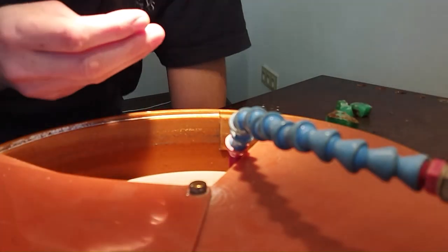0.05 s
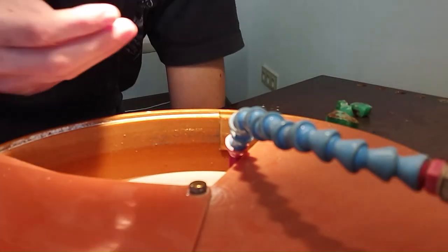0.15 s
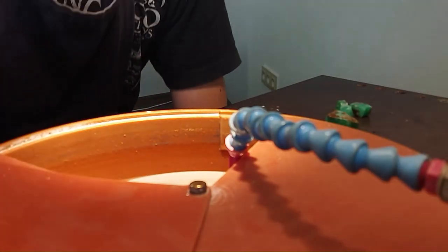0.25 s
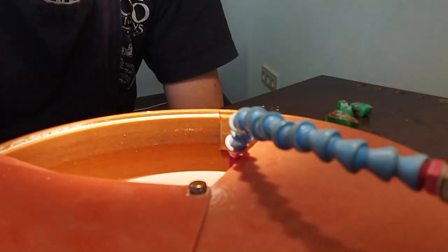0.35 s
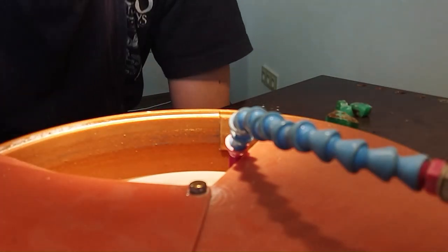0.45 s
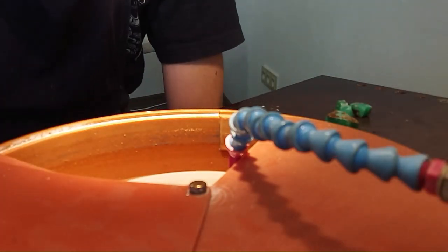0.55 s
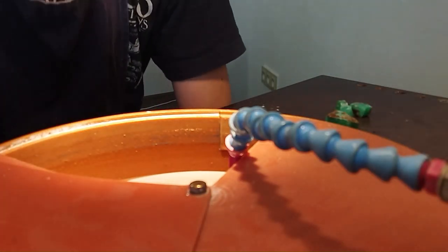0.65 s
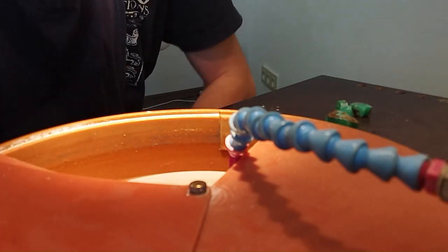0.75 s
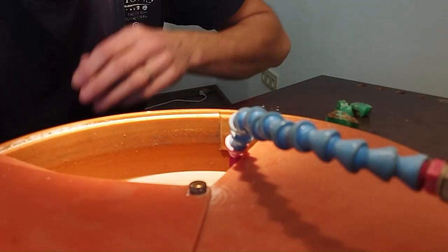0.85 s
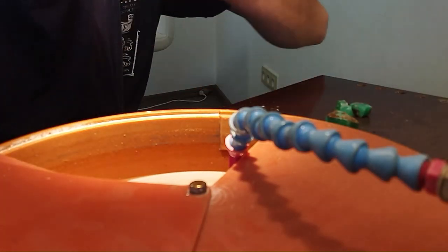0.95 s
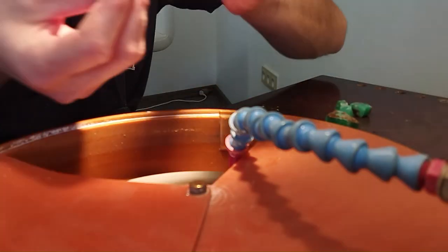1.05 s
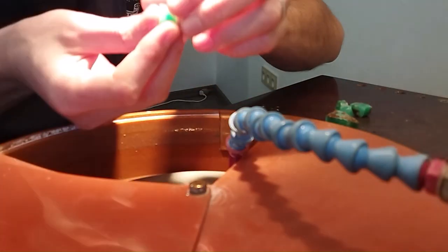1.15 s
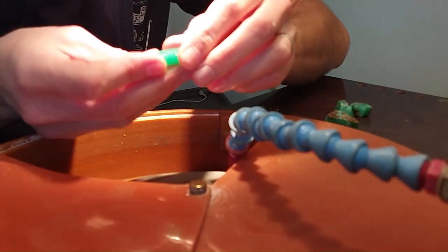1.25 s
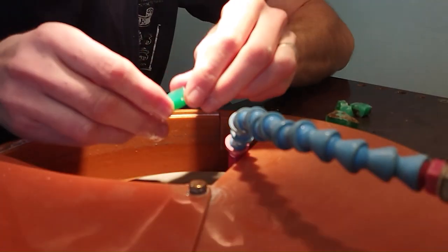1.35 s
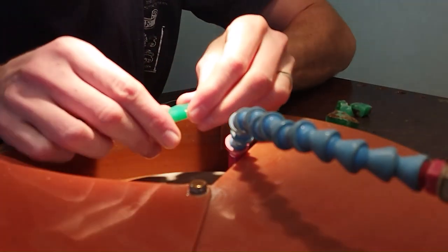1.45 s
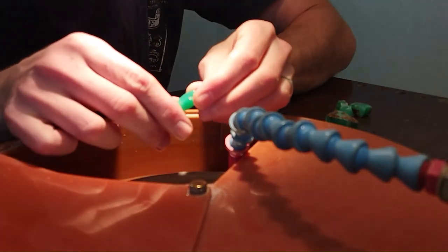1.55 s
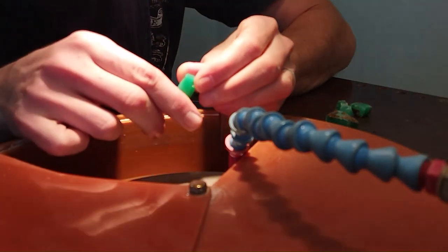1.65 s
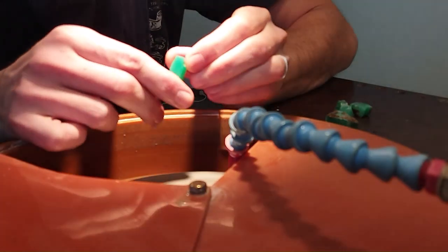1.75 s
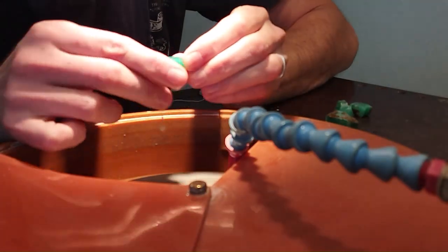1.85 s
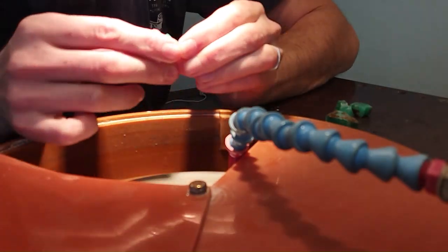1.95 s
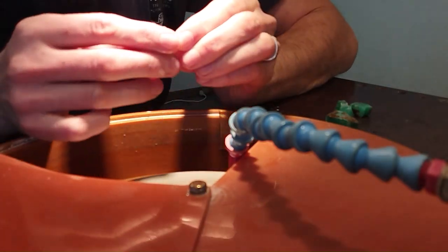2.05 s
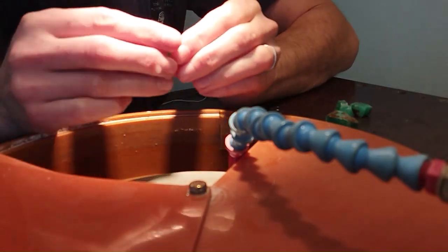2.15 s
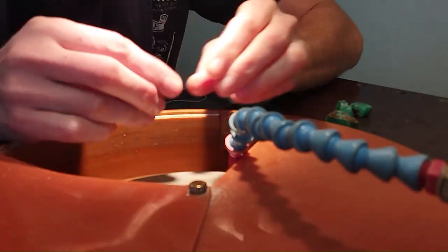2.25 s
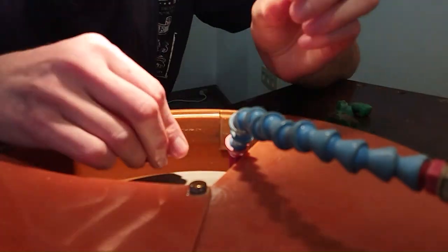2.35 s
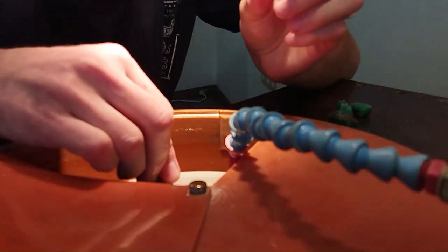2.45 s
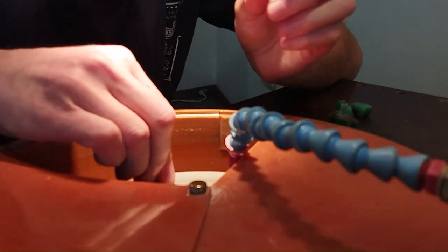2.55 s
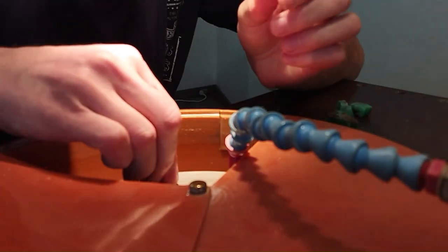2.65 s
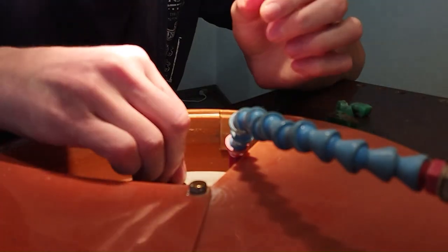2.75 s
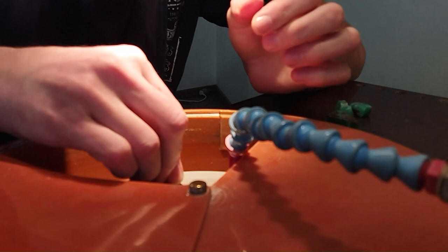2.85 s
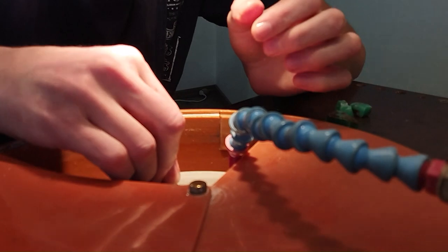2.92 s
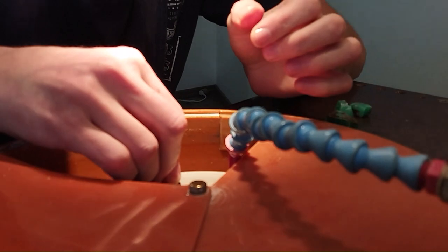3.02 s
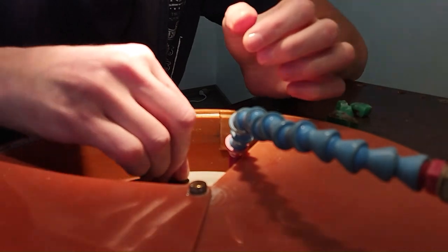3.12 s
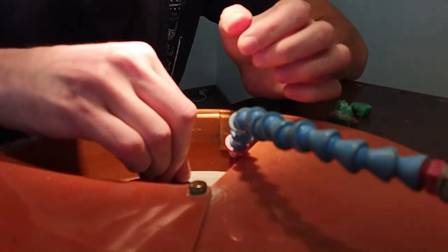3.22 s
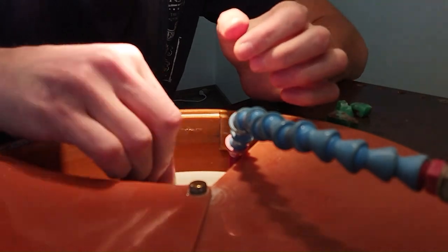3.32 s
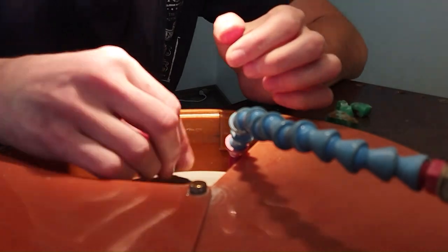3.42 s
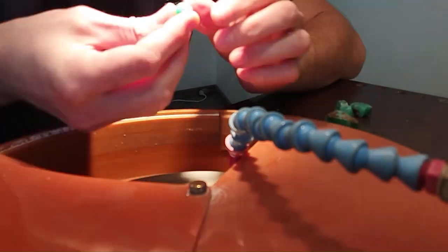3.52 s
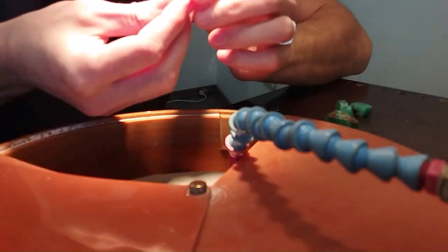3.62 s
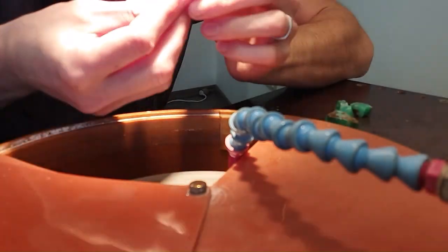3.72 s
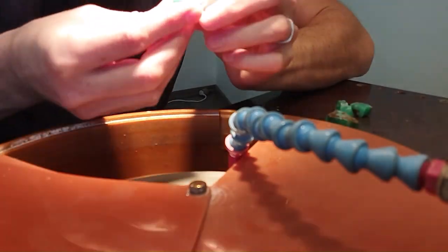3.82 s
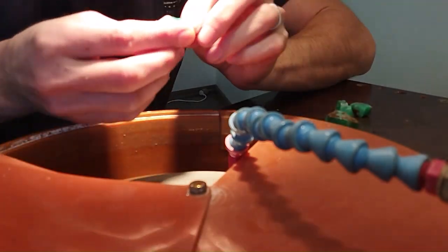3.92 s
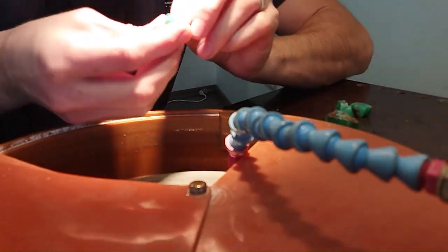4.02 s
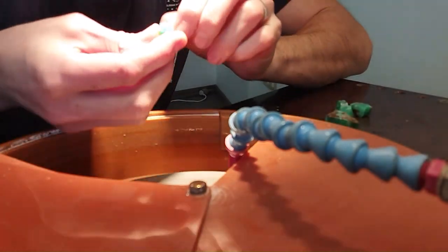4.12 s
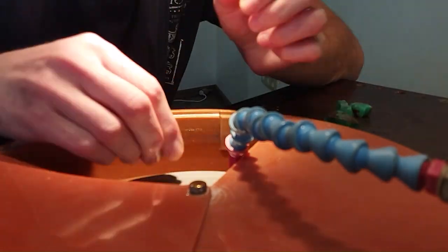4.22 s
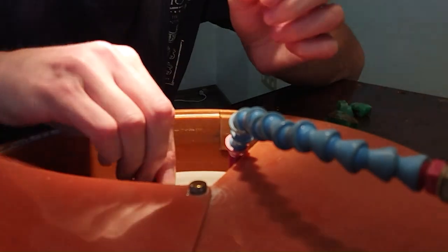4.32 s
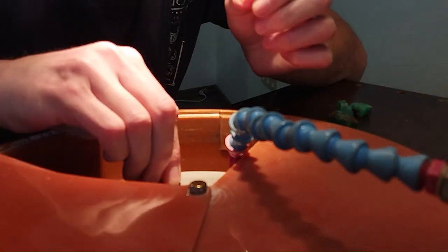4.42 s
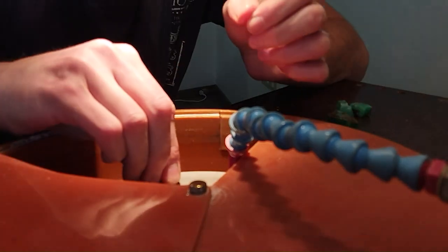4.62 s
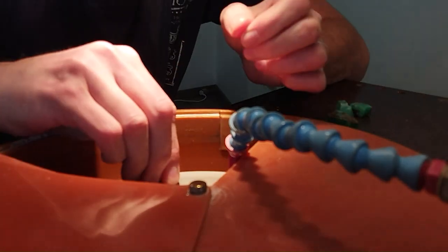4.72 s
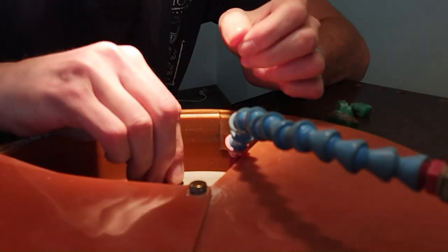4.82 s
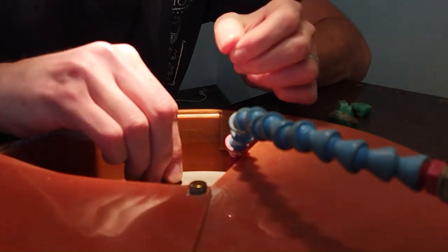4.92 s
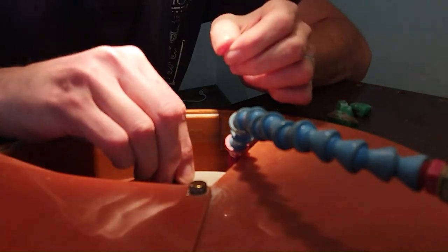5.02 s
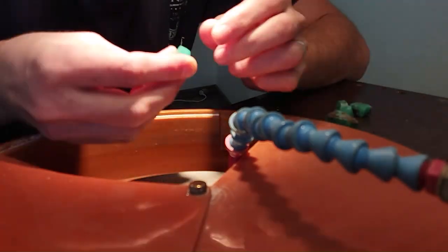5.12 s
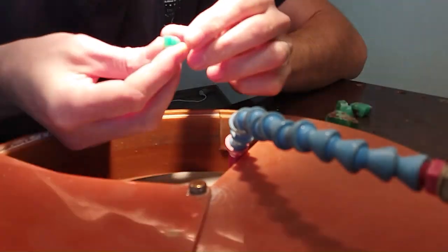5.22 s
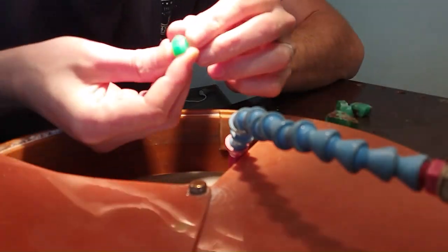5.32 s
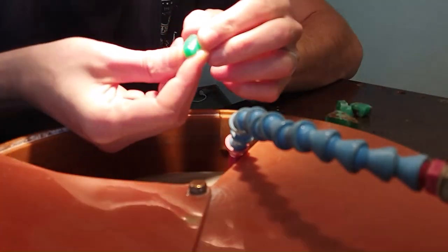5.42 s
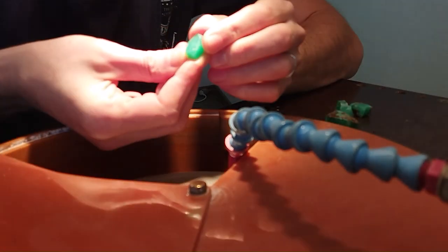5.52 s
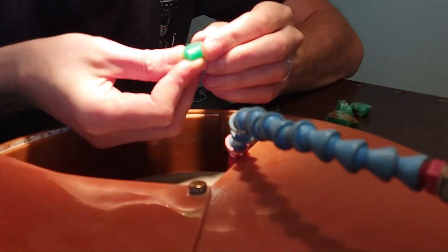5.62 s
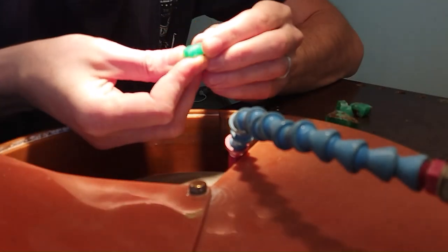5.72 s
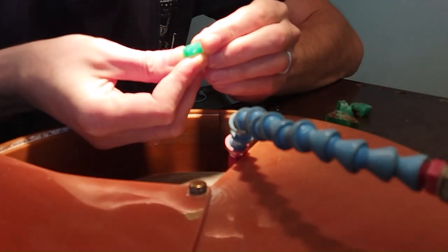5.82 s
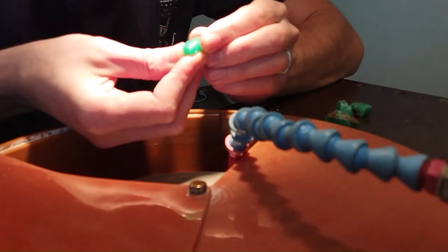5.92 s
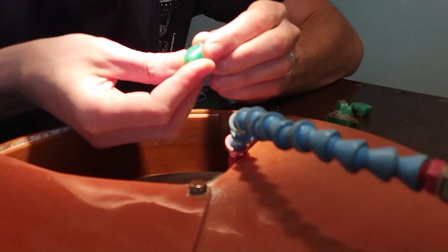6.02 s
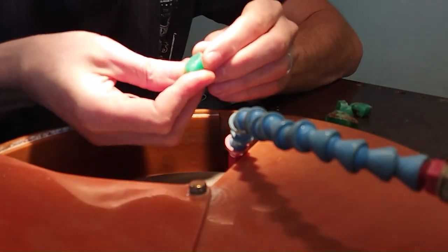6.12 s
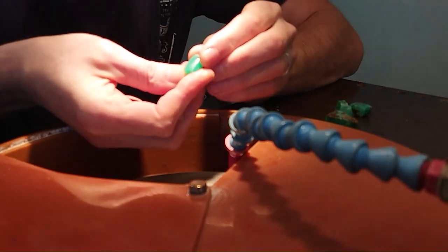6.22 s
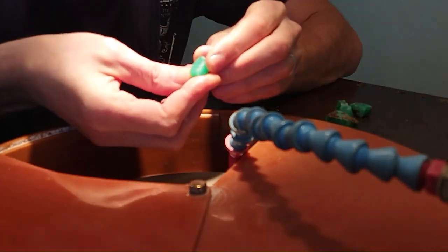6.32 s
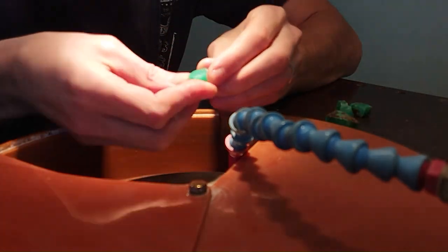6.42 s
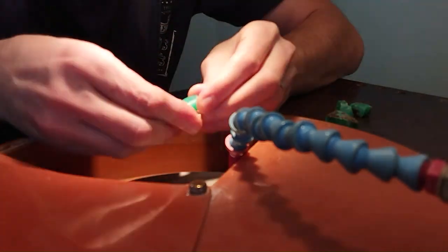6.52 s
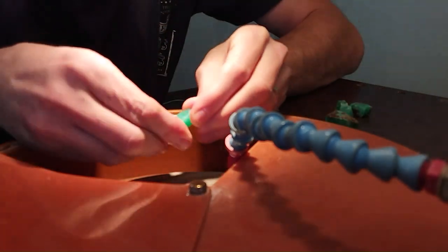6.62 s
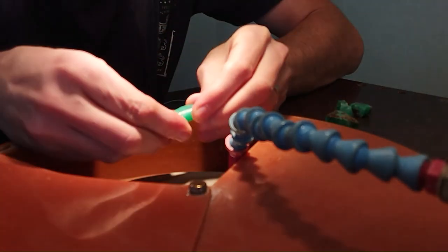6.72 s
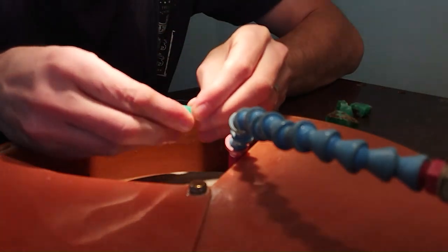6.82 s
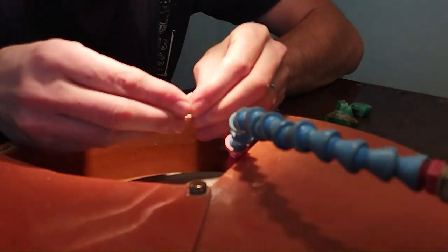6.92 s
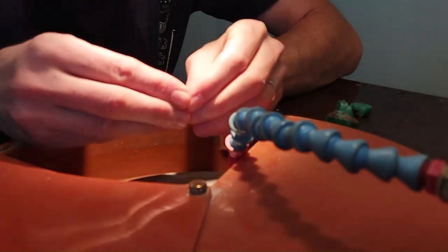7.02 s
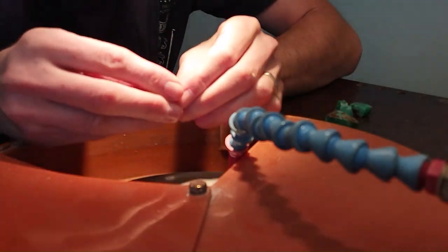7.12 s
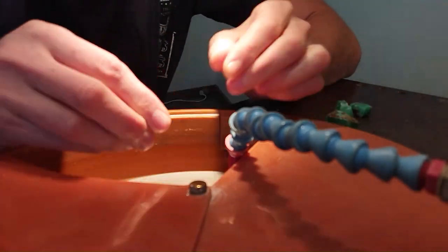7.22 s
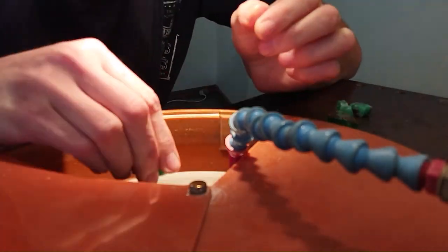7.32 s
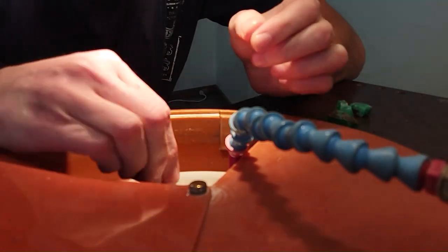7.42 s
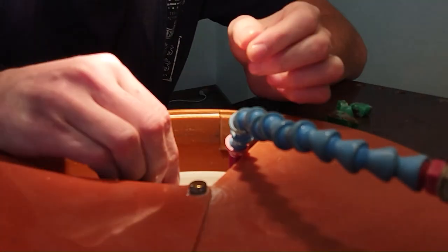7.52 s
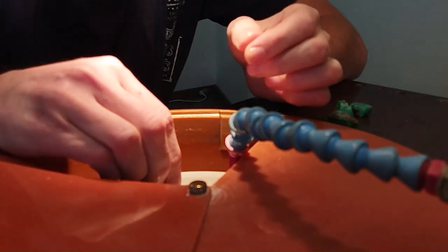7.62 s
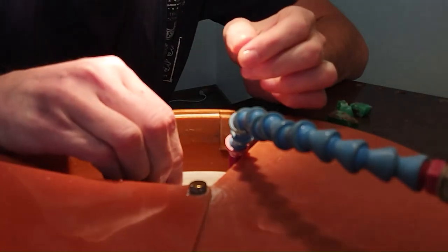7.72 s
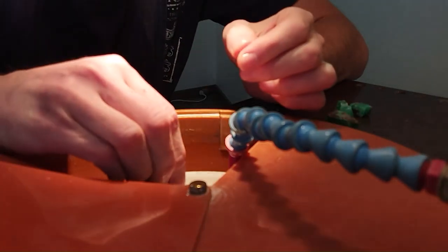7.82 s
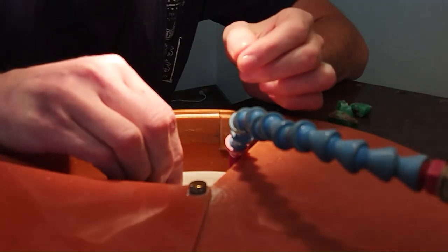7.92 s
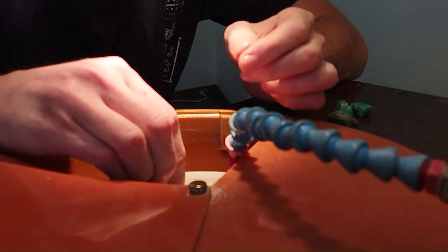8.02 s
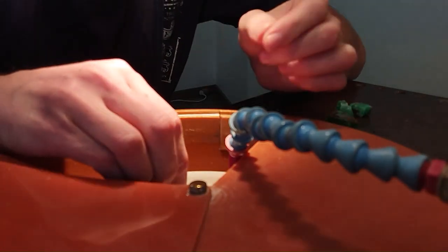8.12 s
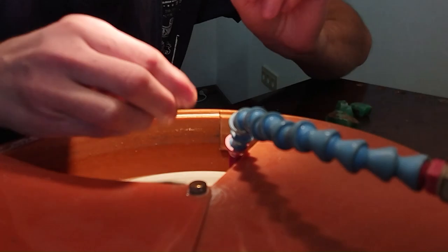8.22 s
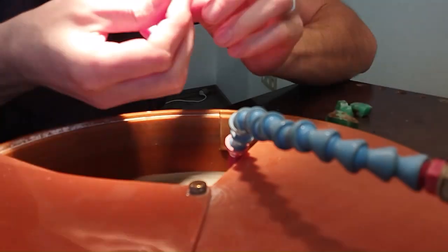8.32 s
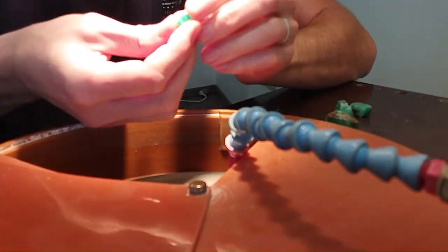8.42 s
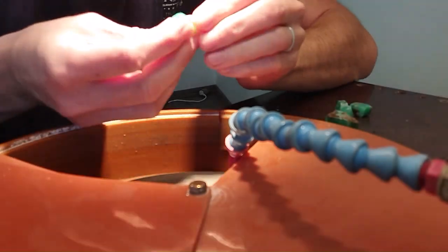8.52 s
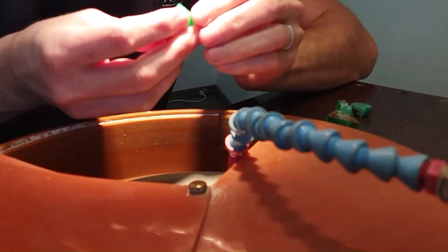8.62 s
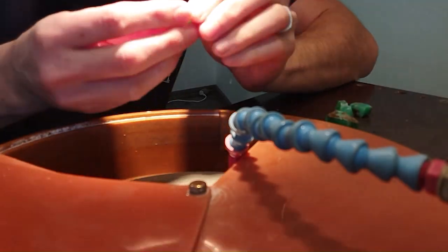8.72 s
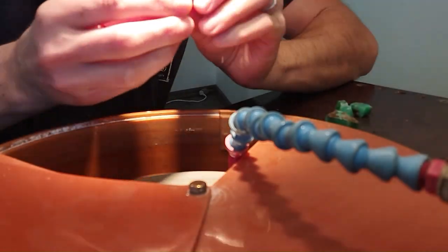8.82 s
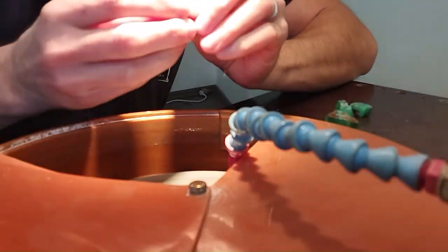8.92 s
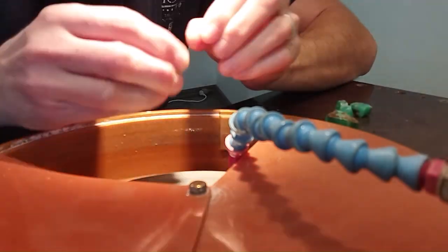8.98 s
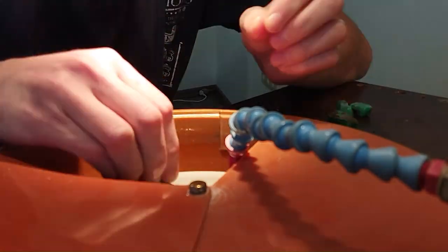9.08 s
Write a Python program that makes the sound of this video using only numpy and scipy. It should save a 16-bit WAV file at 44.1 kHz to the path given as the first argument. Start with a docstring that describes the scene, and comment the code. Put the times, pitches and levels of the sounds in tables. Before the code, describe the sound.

A wet grinding wheel hums, whines and rattles in a small workshop while a stone is pressed on three times with loud, bright, singing hisses.

```python
"""From the start a lapidary wheel spins in a plastic tub in a small hard-walled workshop: motor tones hum and
whine, random impacts make the rattle and the wash of water; early on, noise bursts make a faint rustle of
clothing, then soft knocks on the bench. Then a small stone is pressed on three times: a tick and a ring of the
disc at first touch, then grit hisses as shaped noise and the seated stone sings through its resonances until
it lifts. Single disc clacks come before and during the presses; a dull thud of the tub marks each landing."""
import sys
import numpy as np
from scipy import signal
from scipy.fft import rfft, irfft, next_fast_len
from scipy.io import wavfile
from scipy.ndimage import uniform_filter1d, map_coordinates

SR = 44100
rng = np.random.default_rng(int(sys.argv[2]) if len(sys.argv) > 2 else 0)


def pcm_store(signal):
    """Save signal as 16-bit PCM."""
    levels = np.round(np.clip(np.atleast_2d(signal), -1, 1) * 32767)
    wavfile.write(sys.argv[1], SR, levels.astype(np.int16).T)


N = 403515
TIME = np.arange(N) / SR
SIZE = next_fast_len(N + SR // 2, True)  # transform length, with space for the reflections
FREQ = np.fft.rfftfreq(SIZE, 1 / SR)


def gain_of(db):
    """Amplitude factor of a level in dB."""
    return 10 ** (np.asarray(db) / 20)


def evened(x):
    """Scales a signal to rms 1."""
    return x / np.sqrt(np.mean(x ** 2) + 1e-20)


def read(points, column=1):
    """One column of a table, joined by straight lines on a log-frequency axis."""
    rows = np.array(points, float)
    return np.interp(np.log(FREQ + 1), np.log(rows[:, 0] + 1), rows[:, column])


def curve(points):
    """A two-column table over time, joined by straight lines."""
    return np.interp(TIME, *np.transpose(points))


def modes(rows):
    """Gain over frequency of a set of steep-sided resonances, which radiate no deep bass."""
    power = 0
    for hz, width, db in rows:
        no_bass = np.minimum(FREQ / hz, 1)
        peak = gain_of(db) * no_bass / (1 + ((FREQ - hz) / width) ** 2)
        power = power + peak ** 2
    return np.sqrt(power)


def hump(s, half_s):
    """A smooth rise and fall of height 1 round a moment."""
    return np.exp(-((TIME - s) / half_s) ** 2)


def blow(s, rise, t60):
    """Strength of a blow over time: a short rise, then an exponential fall."""
    fall = np.exp(-np.maximum(TIME - s - rise, 0) * np.log(1000) / t60)
    return np.clip((TIME - s) / rise, 0, 1) * fall


def drift(rate_hz):
    """A random curve of rms 1, joining two random points per cycle of the given rate."""
    knots = rng.standard_normal(8192)
    return evened(np.interp(TIME * rate_hz * 2, np.arange(len(knots)), knots))


def noise():
    """Two independent streams of white noise."""
    return rng.standard_normal((2, N))


def grains(per_s, spread_db):
    """Two independent streams of tiny random impacts; the spread makes their sizes more unequal."""
    size = gain_of(spread_db * np.minimum(rng.exponential(1, N), 4))
    return evened(noise() * size * (rng.random(N) < per_s / SR))


def tone(hz, waver, flutter_db):
    """A sine line of rms 1 that wavers in pitch and strength."""
    turns = np.cumsum(hz * (1 + waver * drift(14))) / SR
    return evened(np.sin(2 * np.pi * turns) * gain_of(flutter_db * drift(6.6)))


def shifted(x, hz):
    """Slides every frequency of a sound up or down by a curve in Hz."""
    turns = np.cumsum(hz * np.ones(N)) / SR
    return (signal.hilbert(x, SIZE)[:, :N] * np.exp(2j * np.pi * turns)).real


def workshop(wet_db, t60):
    """Direct gain, and dense decaying reflections from tub, bench and walls for three spots round the wheel."""
    t = np.arange(SR // 2) / SR
    shape = (3, 2, len(t))
    taps = rng.standard_normal(shape) * (rng.random(shape) < .1) * (t > .002)
    taps *= np.exp(-np.log(1000) * t / t60)
    taps *= gain_of(wet_db) / np.linalg.norm(taps, axis=-1, keepdims=True)
    direct = 1 / np.hypot(1, gain_of(wet_db))
    return direct, direct * rfft(taps, SIZE)


def radiate(drive, colour, ports, room):
    """A drive fills the room, takes a colour and reaches both ports; for white noise their mean keeps its level."""
    direct, tails = room
    # the moving hands keep changing the reflections: the three spots trade places in a steady cycle
    spot = np.arange(len(tails))[:, None, None] / len(tails)
    share = np.cos(np.pi * (1.3 * TIME + spot)) * np.sqrt(2 / len(tails))
    reflected = (rfft(drive * share, SIZE) * tails).sum(0)
    a, b = direct * rfft(drive, SIZE) + reflected
    # the first stream is common to both ports, the second is opposite in them
    same, phase = np.clip(read(ports, column=2), 0, 1), read(ports, column=3)
    lean = gain_of(read(ports) / 2)
    common, apart = a * np.sqrt((1 + same) / 2), b * np.sqrt((1 - same) / 2)
    port_power = lean ** 2 + lean ** -2 + 2 * same * np.cos(phase)
    mid_power = np.mean(colour ** 2 * port_power) / 4
    pair = np.array([(common + apart) * lean * np.exp(1j * phase), (common - apart) / lean])
    return irfft(pair * colour / np.sqrt(mid_power), SIZE)[:, :N]


# the machine at the two microphone ports: (f/Hz, left-right level/dB, likeness 0-1, phase/rad)
MACHINE_PORTS = [(150, 3, 0.55, 1), (354, 2, 0.5, -0.5), (815, -1.5, 0.19, -0.46), (1550, -2, 0.64, -0.2),
                 (2120, -0.5, 0.25, 2), (2830, -2.5, 0.14, 2.5), (3400, -1.5, 0.68, 4), (3860, 0, 0.09, 4),
                 (7460, 1.5, 0.14, 4.5), (10250, 2, 0.5, 5), (13400, 1, 0.7, 16), (15400, 19, 0.3, -3)]
# spectrum of the housing rumble: (f/Hz, relative level/dB)
RUMBLE = [(65, -61), (110, -26), (171, -9), (226, -10), (257, -7.5), (334, -4), (439, -13.5), (571, -10.5),
          (648, -3), (742, -5), (816, 0), (915, -0.5), (1000, -10), (1350, -4), (1760, -6), (2970, -120)]
# speed of the wheel: (t/s, share of its working speed)
SPEED = [(0, 1.015), (2.5, 1.014), (4.35, 1.012), (5.2, 1.001), (6.6, .999), (7.3, .991), (8.4, .989),
         (8.9, 1), (9.15, 1)]
# steady hum of the motor: (f/Hz, level/dB)
HUM = [(199.4, -66), (247, -62.5), (268.8, -60), (317.6, -61.5), (1077, -68)]
# tones of the drive: (f/Hz at working speed, level/dB at working speed, level/dB when running fast)
DRIVE = [(616, -74, -64), (649, -63, -60), (680, -64, -70), (813, -53, -59), (860, -59.5, -68),
         (1281, -64, -74), (1296, -76, -61), (1383, -59, -67), (1427, -58, -63), (1476, -53, -50.5),
         (1514, -64, -54), (1618, -47.5, -59), (1662, -66, -54), (1840, -55, -58), (1986, -62, -70)]
# rough upper tones of the drive at working speed: (f/Hz, width/Hz, relative level/dB)
WHIRR = [(2345, 14, -5), (2743, 16, 2.5), (3075, 18, 1.5), (3135, 18, 0), (3480, 16, -4)]
# thin whistle of the spinning wheel at working speed: (f/Hz, level/dB before its swell)
WHINE = [(4708, -46), (4890, -51), (8226, -61)]
# swell of the whistle: (t/s, level/dB)
WHINE_LEVEL = [(0, -21), (.6, -9.5), (2.5, -19), (3.7, -10), (4.3, -4.5), (5.3, 1), (6.55, -2), (7, -5),
               (8.4, -9), (8.85, 0), (9.15, -0.5)]
RUMBLE_DB, WHIRR_DB = -47, -48.5
DRIVE_WAVER, WAVER = .001, .0013  # pitch unsteadiness of drive tones, and of hum and whistle (share of pitch)
PRESSED_DB = -34  # level of drive tones and whirr while the stone is pressed, against running free
WHINE_AIR_DB, WHINE_WIDTH_HZ = -52.5, 22  # breathy edge of the whistle, before its swell


def motor(room):
    """Housing rumble and steady hum, with tones, a whirr and an airy whistle that follow the wheel speed."""
    rumble = gain_of(RUMBLE_DB) * radiate(noise(), gain_of(read(RUMBLE)), MACHINE_PORTS, room)
    speed, swell_db = curve(SPEED), curve(WHINE_LEVEL)
    fast = np.clip((speed - 1) / (speed.max() - 1), 0, 1)
    contact = sum(1. * (TIME > row[0]) * (TIME < row[1]) for row in PRESSES)
    pressed_gain = gain_of(PRESSED_DB * uniform_filter1d(contact, size=2000))

    hum = sum(gain_of(db) * tone(hz, waver=WAVER, flutter_db=2.5) for hz, db in HUM)
    drive = 0
    for hz, db, fast_db in DRIVE:
        level = gain_of(db + (fast_db - db) * fast)
        drive = drive + level * tone(hz * speed, waver=DRIVE_WAVER, flutter_db=2.2)

    whistle = sum(gain_of(db + swell_db) * tone(hz * speed, waver=WAVER, flutter_db=-1.0) for hz, db in WHINE)
    breath = modes([(hz, WHINE_WIDTH_HZ, db) for hz, db in WHINE])
    air = radiate(gain_of(WHINE_AIR_DB + swell_db) * noise(), breath, MACHINE_PORTS, room)
    air = shifted(air, WHINE[0][0] * (speed - 1))

    whirr = gain_of(WHIRR_DB) * radiate(noise(), modes(WHIRR), MACHINE_PORTS, room)
    whirr = shifted(whirr, WHIRR[2][0] * (speed - 1)) * pressed_gain
    tones = hum + drive * pressed_gain + whistle
    return rumble + whirr + air + tones * gain_of([[-1], [1]])


# modes of the disc in its tub: (f/Hz, width/Hz, relative level/dB)
DISC = [(1495, 65, 5), (1386, 65, -14), (1626, 46, 5.5), (1705, 113, -2), (1860, 38, -0.5)]
# spectrum of the water washing over the disc: (f/Hz, relative level/dB)
WASH = [(1120, -47), (1900, -5.5), (2180, -3), (2830, 2.5), (3340, 2), (3660, 2.5), (3800, -2.5),
        (4240, -6), (4470, -5.5), (4620, -2.5), (4860, -3), (5350, -2), (6000, -41), (7800, -53),
        (13200, -120)]
# spectrum of the flying drops: (f/Hz, relative level/dB)
SPRAY = [(3410, -13.5), (5400, 1.5), (5820, 3), (6150, 4), (8080, 6), (8760, 0.5), (9650, 2.5), (11400, -2),
         (13400, -2), (14600, -8), (15700, -1), (16000, -7.5)]
# the water surges on the disc: (t/s, half length/s, extra rattle level/dB, extra wash level/dB)
SURGES = [(.15, 0.24, -1, 1.5), (1.708, 0.12, 3.5, 1.5), (2.306, 0.23, 2.5, 0.5), (6.198, 0.2, 1.5, 0),
          (6.867, 0.089, 4, 2.5), (8.5, 0.15, 3.5, 2.5)]
RATTLE_DB, RATTLE_RISE_DB_PER_S = -41.5, 0.2035  # the free-running disc grows slowly louder
WASH_DB, SPRAY_DB = -40, -41
WHEEL_HZ = 32.75  # mean turns a second


def wet_wheel(room):
    """The disc rattles, water washes over it in surges, and drops fly off in a pulse with every turn."""
    rattle_db = RATTLE_DB + RATTLE_RISE_DB_PER_S * TIME + sum(db * hump(s, half) for s, half, db, _ in SURGES)
    wash_db = WASH_DB + sum(db * hump(s, half) for s, half, _, db in SURGES)
    turn = 2 * np.pi * np.cumsum(WHEEL_HZ + 0.12 * drift(1.7)) / SR
    throb_db = 1.25 * np.cos(turn) + .95 * np.cos(2 * turn)
    rattle = grains(per_s=3500, spread_db=1.3) * gain_of(rattle_db + 1.0 * drift(25))
    wash = grains(per_s=9000, spread_db=2.0) * gain_of(wash_db + 0.93 * drift(25) + 0.41 * drift(2.4))
    spray = grains(per_s=11000, spread_db=3.5) * gain_of(SPRAY_DB + throb_db)
    return (radiate(rattle, modes(DISC), MACHINE_PORTS, room)
            + radiate(wash, gain_of(read(WASH)), MACHINE_PORTS, room)
            + radiate(spray, gain_of(read(SPRAY)), MACHINE_PORTS, room))


# a faint rustle of clothing, then soft knocks on the bench:
#  (t/s, level/dB before the trim, rise/s, decay by 60 dB/s)
RUSTLE_AND_KNOCKS = [(.17, -42.5, 0.045, 0.56), (0.617, -26.5, 0.016, 0.21), (0.66, -41.5, 0.017, 0.16),
                     (0.712, -35, 0.011, 0.063)]
# low modes that colour them: (f/Hz, width/Hz, relative level/dB)
BENCH = [(120, 26, -10.5), (280, 36, -2), (380, 68, -6.5), (530, 50, -2), (680, 43, -0.5), (870, 70, -6)]
# the knocked bench gives a little: (t/s, f/Hz)
GROAN = [(.635, 685), (.655, 590), (.7, 547), (.74, 640)]
BENCH_TRIM_DB = -3.5


def bench(room):
    """Noise bursts through low modes: a faint rustle, then soft knocks; the hard one starts a short, bending groan."""
    push = sum(gain_of(db) * blow(s, rise, t60) for s, db, rise, t60 in RUSTLE_AND_KNOCKS)
    groan = (TIME > RUSTLE_AND_KNOCKS[1][0]) * np.sin(2 * np.pi * np.cumsum(curve(GROAN)) / SR)
    dull = radiate(push * noise(), modes(BENCH), MACHINE_PORTS, room)
    return gain_of(BENCH_TRIM_DB) * (dull + push * groan)


# spectrum of the tub taking the load: (f/Hz, relative level/dB)
THUD = [(25, -10), (90, -22), (140, 5), (200, 0.5), (550, 4.5), (900, -23), (1400, -46)]
# the hand bears down and the tub rumbles: (t/s, half length/s, level/dB)
SHOVES = [(2.825, 0.08, -52.5), (2.98, 0.017, -44.5), (3.195, 0.05, -46), (3.29, 0.07, -48),
          (4.733, 0.031, -47), (4.94, 0.038, -46.5)]
THUD_DB = -56


def tub(room):
    """A dull thud of the tub as the stone lands, and low rumbles when the hand bears down."""
    load = sum(gain_of(THUD_DB) * blow(row[0], rise=0.0015, t60=0.037) for row in PRESSES)
    load = load + sum(gain_of(db) * hump(s, half) for s, half, db in SHOVES)
    return radiate(load * noise(), gain_of(read(THUD)), MACHINE_PORTS, room)


# single clacks of the disc, under the landing stone or running free: (t/s, level/dB before the mode levels)
CLACKS = [(2.48, -26), (2.584, -18), (2.603, -20), (2.6347, -34), (2.656, -23), (2.769, -26), (3.138, -25),
          (3.4547, -28), (4.284, -28), (4.357, -18), (4.366, -18), (4.4045, -18), (4.412, -17),
          (4.422, -20), (4.484, -26), (4.529, -25), (4.618, -30), (5.104, -19), (6.96, -23), (6.974, -37),
          (7.007, -34), (7.074, -25), (7.457, -34), (7.473, -26), (7.4904, -16.5), (7.5363, -18),
          (7.554, -25), (7.627, -28), (7.667, -30)]
# what a clack rings with: (f/Hz, relative level/dB, decay by 60 dB/s)
CLACK_MODES = [(1520, 10, 0.014), (1610, 9, 0.015), (1880, -3, 0.016)]
CLACK_RISE_S = 0.0025


def clacking(room):
    """The loose disc strikes its seat; every clack rings its modes in a slightly different mix."""
    at, db = np.transpose(CLACKS)
    mix = 1 + .3 * rng.standard_normal((len(at), len(CLACK_MODES), 2))
    mix[:, :, 1] *= rng.choice([-1, 1], mix.shape[:2])
    t, out = np.arange(SR // 10) / SR, 0
    for k, (hz, mode_db, t60) in enumerate(CLACK_MODES):
        hits = np.zeros((2, N))
        hits[:, np.round(at * SR).astype(int)] = gain_of(db + mode_db) * mix[:, k].T
        envelope = np.minimum(t / CLACK_RISE_S, 1) * np.exp(-np.log(1000) * t / t60)
        ring = envelope * np.sin(2 * np.pi * hz * t)
        out = out + signal.oaconvolve(hits, ring[None], axes=1)[:, :N]
    return radiate(out, np.ones(len(FREQ)), MACHINE_PORTS, room)


# the stone on the wheel, levels before swell, grip and trims: (touch t/s, lift t/s, fizz level/dB,
#  song level/dB, rise of the song/dB per s, seating time constant/s, extra disc ring on landing level/dB,
#  its settling time constant/s, steady ring level/dB, rasp level/dB, tick level/dB)
PRESSES = [(2.576, 3.494, -20.5, -26.5, 4, 0.008, -30.5, 0.052, -40, -42, -25),
           (4.354, 5.122, -22.5, -25.5, 1, 0.011, -27.5, 0.26, -52, -41, -20),
           (7.47, 8.211, -22.5, -24, 3, 0.024, -37, 0.34, -34.5, -36.5, -17)]
SWELL_DB = 1  # the hand bears down hardest midway through a press
ATTACK_S, RELEASE_S = .002, 0.0049  # contact rise, and its decay constant as the stone lifts
ROLL_S, ROLL_SONG_DB, ROLL_RING_DB = 0.01, -37.5, -31  # at the lift the stone rolls on to its edge and rings again


def press(touch, lift, fizz_db, song_db, rise_db, seat_s, landing_db, settle_s, ring_db, rasp_db, tick_db):
    """Strength of fizz, song, ring and rasp: the stone lands hard, the disc settles, the stone seats and lifts."""
    age = np.maximum(TIME - touch, 0)
    held = np.minimum(age, lift - touch)
    contact = np.minimum(age / ATTACK_S, 1) * np.exp(-np.maximum(TIME - lift, 0) / RELEASE_S)
    arch = np.sin(np.pi * held / (lift - touch))
    roll = hump(lift, ROLL_S)
    tick = gain_of(tick_db) * blow(touch, rise=0.0012, t60=0.034)
    fizz = gain_of(fizz_db - SWELL_DB * (1.5 - arch))
    seated = 1 - np.exp(-age / seat_s)
    song = gain_of(song_db + rise_db * held) * seated + gain_of(ROLL_SONG_DB) * roll
    landing = gain_of(landing_db) * np.exp(-age / settle_s)
    ring = gain_of(ring_db) + landing + gain_of(ROLL_RING_DB) * roll
    return np.array([contact * fizz + 0.57 * tick,
                     contact * song + 0.36 * tick,
                     contact * ring,
                     contact * gain_of(rasp_db) + 0.045 * tick])


# the cut at the two microphone ports: (f/Hz, left-right level/dB, likeness 0-1, phase/rad)
CUT_PORTS = [(1540, -8.5, 0.57, 0.96), (2330, -6, 0.33, 0.45), (3270, -4.5, 0.23, 3),
             (5260, -0.5, 0.72, 1.72), (7200, 0, 0.28, 2.8), (9200, 1, 0.15, 4.1), (10400, 5, 0.3, 4.9),
             (12800, 6.5, 0.2, 4.3), (15600, -2, 0, 6.7)]
# the fingers shift and the stone sings and fizzes more or less:
#  (t/s, half length/s, extra song level/dB, extra fizz level/dB)
GRIPS = [(2.586, .008, 6, 0), (2.682, .08, 2.5, 0), (3.04, 0.11, 3, 0), (3.3, 0.24, -3, 1.5),
         (3.47, 0.056, 2, -0.5), (4.41, 0.012, 1, 2), (4.584, 0.08, 2.5, 0.5), (4.706, 0.068, 0.5, 2.5),
         (4.89, 0.14, 2, 2), (5.11, 0.08, 0, 2), (7.53, 0.04, 1, 4), (7.64, .035, 2, 0.5),
         (8.088, .04, 1, 0.5)]
# pitch track of the song, moving with the grip, press by press: (t/s, f/Hz against SONG_REST_HZ)
SONG_PITCH = [
    [(2.6, 5030), (2.678, 5190), (3.48, 5150)],
    [(4.4, 5050), (4.432, 5140), (5.1, 5120)],
    [(7.5, 5170), (7.714, 5080), (8.2, 5140)],
]
# spectrum of the bare grit: (f/Hz, relative level/dB)
FIZZ = [(4410, -59), (7500, 1), (8220, 0.5), (8900, -2.5), (12300, 0), (15200, -6.5), (16000, -7)]
# singing of the stone against the disc, before the pitch track slides it: (f/Hz, width/Hz, relative level/dB)
STONE = [(3973, 224, -1), (4290, 140, -2.5), (5080, 306, 4.5), (5670, 150, -3)]
# modes of the wheel that the seated stone excites: (f/Hz, width/Hz, relative level/dB)
WHEEL = [(3110, 84, -5), (3514, 38, -3.5), (6140, 130, 3), (6720, 420, -0.5), (7230, 190, -1)]
# further disc modes, heard only under the stone: (f/Hz, width/Hz, relative level/dB)
DISC_UNDER_STONE = [(1760, 100, 1.5), (2372, 32, 3), (2880, 340, -3)]
# spectrum of the coarse grit: (f/Hz, relative level/dB)
RASP = [(1000, -71), (1500, -2.5), (2000, 2.5), (2450, 8), (2800, -1), (3300, 4), (3900, 16.5), (4600, -27)]
SONG_REST_HZ = 5115  # track value that leaves the song unshifted
STONE_TRIM_DB, WHEEL_TRIM_DB = -2.0, -4
# balance of the two streams: more of the common one at landing (narrow), then more of the opposite one (wide)
FOCUS_DB, LANDING_FOCUS_DB, FOCUS_S, FOCUS_SWAY_DB = -1.5, 4, 0.017, 1.3
BOUNCE_HZ = 45.4  # mean rate at which the stone bounces in the fingers
CHATTER_DB, UNSTEADY_DB = 1.5, .25  # fast catching on the grit, and slower unsteadiness of the hand
RING_SWAY_DB, RASP_CATCH_DB = 1.2, 2.2  # the disc rings fairly evenly; the coarse grit catches in fits


def grinding(room):
    """Grit chips the stone in dense impacts: a bright fizz from first touch, then the seated stone sings."""
    fizz, song, ring, rasp = sum(press(*row) for row in PRESSES)
    landing = sum(hump(row[0], FOCUS_S) for row in PRESSES)
    focus_db = FOCUS_DB + FOCUS_SWAY_DB * drift(11) + LANDING_FOCUS_DB * landing

    # the stone bounces in the fingers, and catches unevenly on the grit
    bounce = np.cumsum(BOUNCE_HZ + 2.51 * drift(3.9)) * 2 * np.pi / SR
    bounce_db = 0.37 * np.cos(bounce) + 0.4 * np.cos(2 * bounce)
    chatter_db = CHATTER_DB * drift(70) + UNSTEADY_DB * drift(20) + bounce_db
    force = evened(gain_of(chatter_db)) * gain_of(np.array([focus_db, -focus_db]) / 2)

    grip_song_db = sum(db * hump(s, half) for s, half, db, _ in GRIPS)
    grip_fizz_db = sum(db * hump(s, half) for s, half, _, db in GRIPS)
    bend_hz = curve(np.vstack(SONG_PITCH)) - SONG_REST_HZ + 30 * drift(12)
    # at this fizz density every sample is an impact
    fizz = force * fizz * gain_of(grip_fizz_db) * grains(per_s=48000, spread_db=-1.5)
    song = force * song * gain_of(grip_song_db + 0.68 * drift(90)) * grains(per_s=16000, spread_db=0.2)
    ring = force * ring * gain_of(RING_SWAY_DB * drift(18)) * grains(per_s=7600, spread_db=1.0)
    rasp = force * rasp * gain_of(RASP_CATCH_DB * drift(60)) * grains(per_s=6500, spread_db=5.0)

    stone = shifted(radiate(song, modes(STONE), CUT_PORTS, room), bend_hz)
    wheel = radiate(song, modes(WHEEL), CUT_PORTS, room)
    return (radiate(fizz, gain_of(read(FIZZ)), CUT_PORTS, room)
            + stone * gain_of(STONE_TRIM_DB)
            + wheel * gain_of(WHEEL_TRIM_DB)
            + radiate(ring, modes(DISC + DISC_UNDER_STONE), CUT_PORTS, room)
            + radiate(rasp, gain_of(read(RASP)), CUT_PORTS, room))


# each new grip, with the hand cupped round the stone, has its own peaks and hollows, press by press:
#  (f/Hz, width/Hz, level/dB)
GRIP_COLOUR = [
    [(2770, 240, -10), (4600, 110, -3), (7650, 220, -4), (8850, 250, -5), (9300, 130, 0.5),
     (11900, 250, -2.5), (13350, 250, -1), (15500, 300, 2.5)],
    [(2400, 130, 1.5), (3650, 110, -7), (6330, 170, -2.5), (6720, 140, 0.5), (7760, 680, -1.5),
     (9700, 190, 6.5), (11400, 270, 2), (13700, 280, 3.5), (14350, 170, -5), (15150, 450, 4)],
    [(2400, 98, -1), (3570, 93, -2), (4300, 150, 1), (7500, 110, 0), (7550, 200, -6), (8600, 170, 2.5),
     (10050, 250, -1), (10550, 190, 5), (11800, 130, 2), (12300, 190, 0), (12850, 190, 2.5),
     (14700, 200, -1), (15350, 230, 1)],
]
PATCH_DB = 1.6  # the colour of the cut flickers in random patches
PATCH_HZ, PATCH_S = 260, .06  # spacing of the random patches


def gripped(cut):
    """Colours the cut by the grip of each press, and by random patches in time and frequency."""
    hz, t, z = signal.stft(cut, SR, nperseg=512)
    colours = np.array([sum(db * np.exp(-((hz - at) / width) ** 2) for at, width, db in rows)
                        for rows in GRIP_COLOUR])
    # the next grip takes over shortly before its touch
    which = np.searchsorted([row[0] - .1 for row in PRESSES[1:]], t)
    grid = rng.standard_normal((int(hz[-1] / PATCH_HZ) + 2, int(t[-1] / PATCH_S) + 2))
    where = np.meshgrid(hz / PATCH_HZ, t / PATCH_S, indexing="ij")
    patches = evened(map_coordinates(grid, where, order=1))
    coloured = z * gain_of(colours[which].T + PATCH_DB * patches)
    return signal.istft(coloured, SR, nperseg=512)[1][:, :N]


def scene():
    """Machine, bench and stone share one small, lively room."""
    room = workshop(wet_db=-1.0, t60=0.37)
    machine = motor(room) + wet_wheel(room)
    knocks = bench(room) + tub(room) + clacking(room)
    return machine + knocks + gripped(grinding(room))


CEILING = .8  # share of full scale that the rounded peaks approach
LOW_CUT_HZ, EDGE_HZ = 204, 15780


def record(dry):
    """The tallest peaks are rounded off, the small microphones lose the bass; then the band limit."""
    rounded = dry / (1 + (dry / CEILING) ** 6) ** (1 / 6)
    thin = signal.sosfilt(signal.butter(2, LOW_CUT_HZ, "high", fs=SR, output="sos"), rounded)
    band_limit = signal.firwin(511, EDGE_HZ, window=("kaiser", 9), fs=SR)
    return signal.oaconvolve(thin, band_limit[None], "same")


dry = scene()
out = record(dry)
pcm_store(out)
```